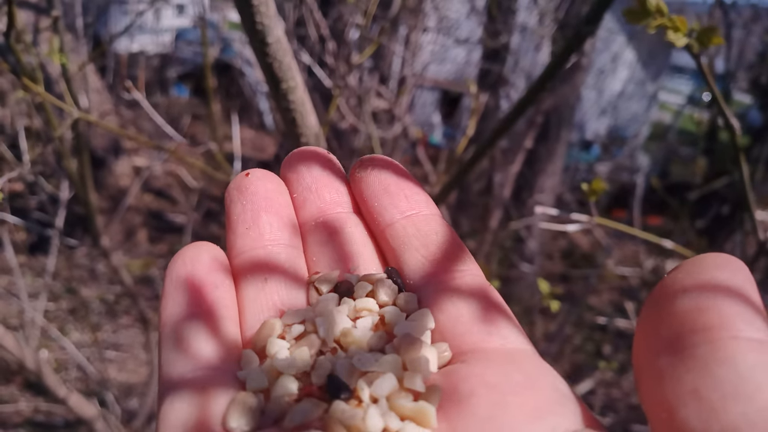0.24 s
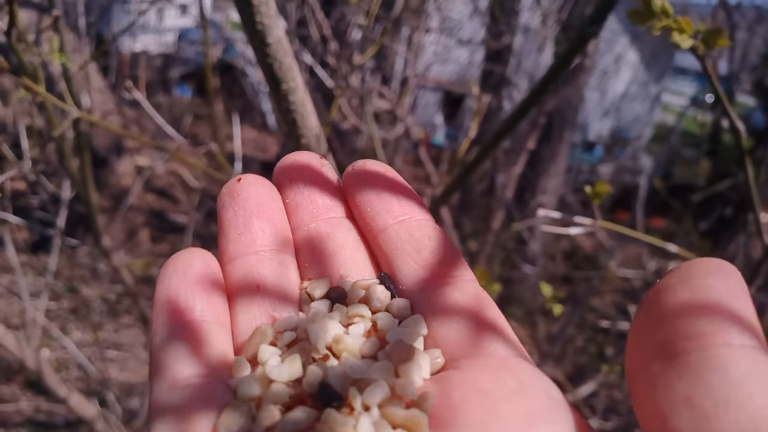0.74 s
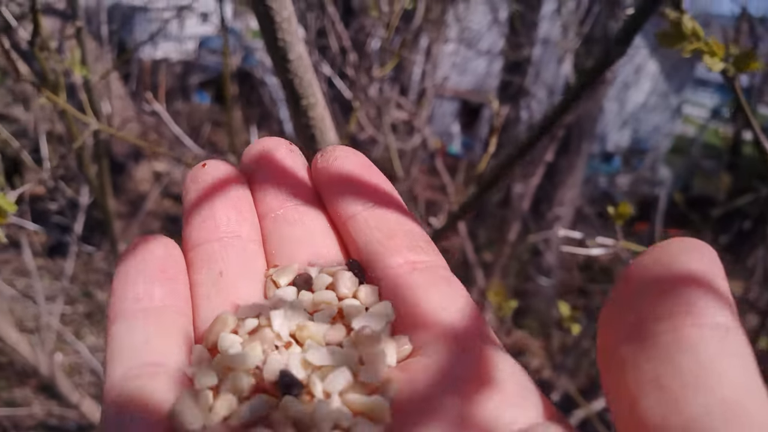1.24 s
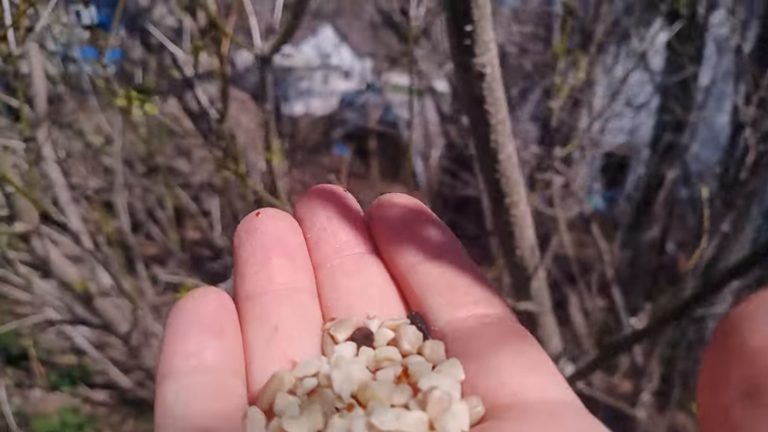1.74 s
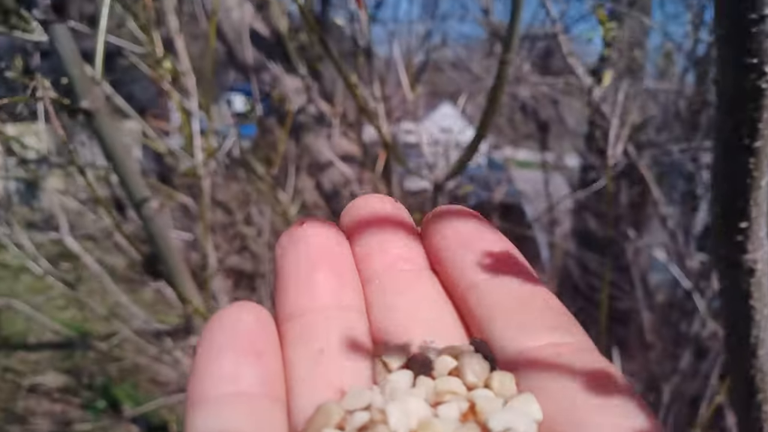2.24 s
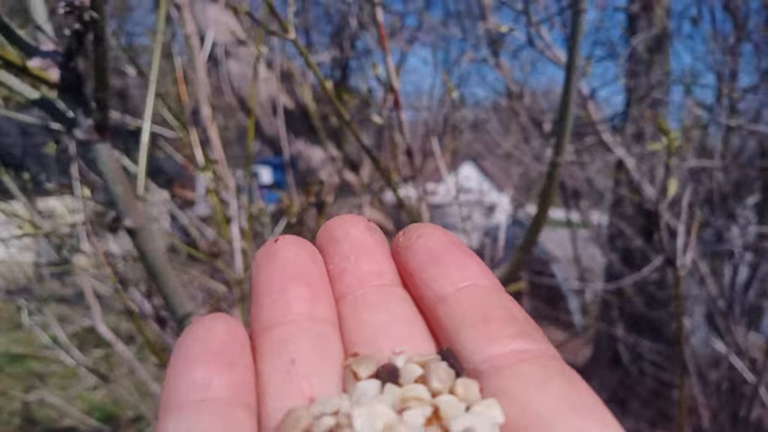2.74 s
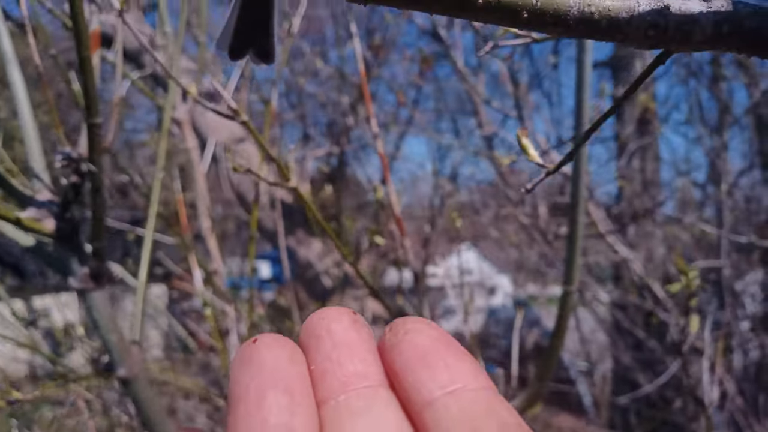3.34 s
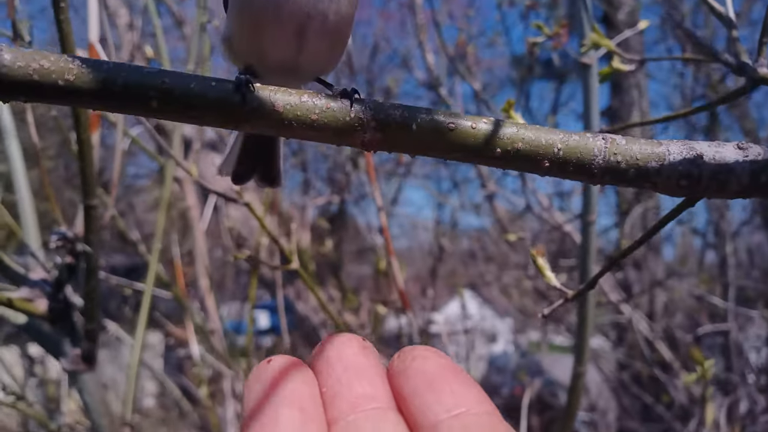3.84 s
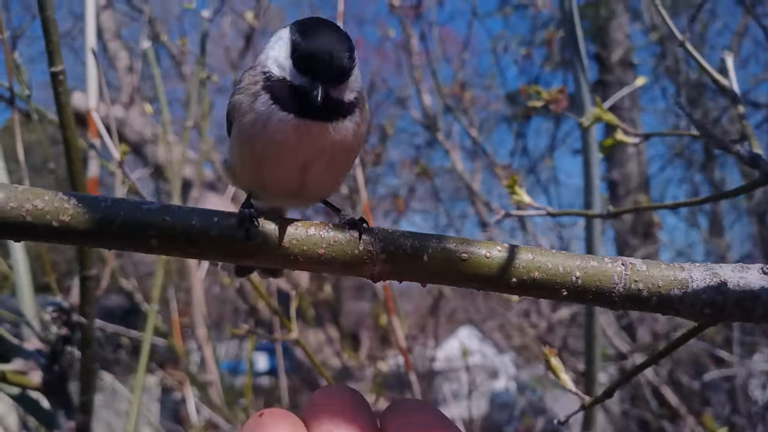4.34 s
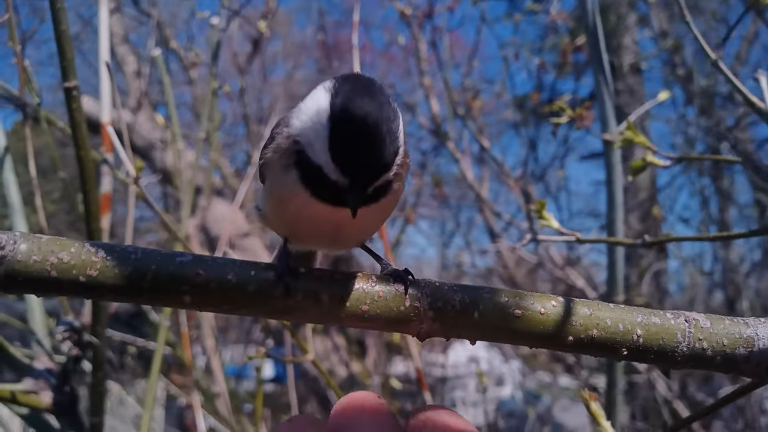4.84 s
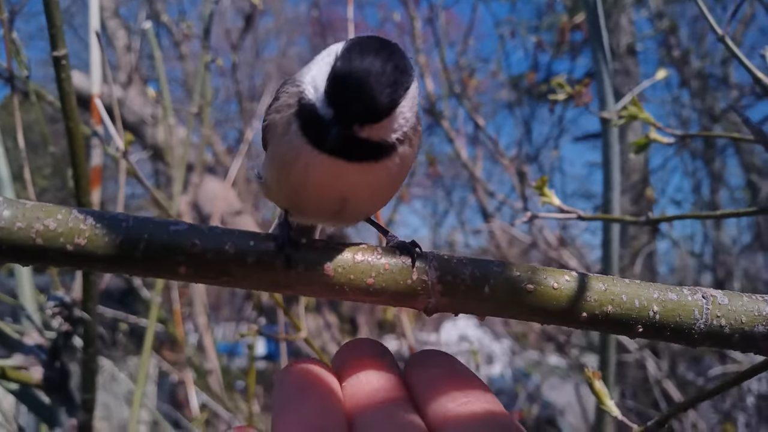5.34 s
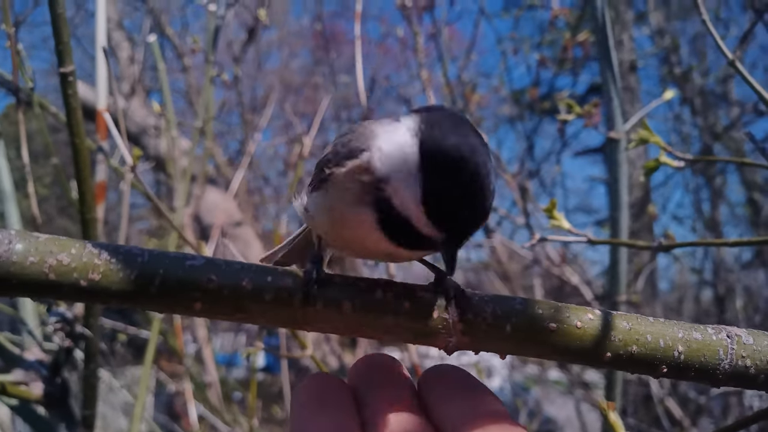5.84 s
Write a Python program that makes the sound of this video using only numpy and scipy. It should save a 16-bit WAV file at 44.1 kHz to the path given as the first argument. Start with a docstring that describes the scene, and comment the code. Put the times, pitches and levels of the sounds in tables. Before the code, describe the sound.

A small bird close by rasps harsh, buzzy begging notes in short bursts outdoors, over a low thumping engine rumble and soft distant traffic.

```python
"""A small bird in bare branches, close to the microphone, rasps groups of begging notes.
A fast membrane in its throat is shaken by a slower flap; moving bands of the windpipe colour the voice.
A far engine thumps about ten times a second as pushes into ringing exhaust modes; distant traffic
is a low filtered hiss, a far bird whistles a wavering sine, and a few twigs tick over a faint hiss."""
import sys
import numpy as np
from scipy import signal
from scipy.fft import rfft, irfft
from scipy.io import wavfile
from scipy.ndimage import uniform_filter1d

SR = 44100
rng = np.random.default_rng(int(sys.argv[2]) if len(sys.argv) > 2 else 0)


def inscribe(sig):
    """Save sig as 16-bit PCM at rate SR to the path in sys.argv[1].

    A 1-D sig is mono; a 2-D sig holds one channel per row.
    Samples are clipped to [-1, 1] before scaling.
    """
    pcm = np.round(np.clip(np.atleast_2d(sig).T, -1, 1) * 32767)
    wavfile.write(sys.argv[1], SR, pcm.astype(np.int16))


N = 268128
TIME = np.arange(N) / SR

# begging notes of the near bird: (start [s], end [s])
NOTE_SPANS = [(.63, .755), (.802, .882), (.955, 1.034), (2.47, 2.576), (2.626, 2.707), (2.754, 2.843),
              (2.918, 3.05), (4.24, 4.274), (4.369, 4.431), (5.865, 5.953), (6.018, 6.095)]
# sputters where the voice catches or dies: (middle [s], level [dB], Gaussian half width [ms], membrane [Hz])
SPUTTERS = [(0.949, -43, 1.7, 1750), (2.461, -34, 1.6, 2700), (2.464, -26, 0.66, 2738),
            (2.8452, -49, 1.11, 2050), (4.2283, -26, 0.96, 2542), (4.2363, -28, 1.04, 2076),
            (4.284, -26, 1.17, 1897), (4.303, -28.5, 0.83, 2256), (4.36, -29, 1.02, 1840),
            (4.363, -24.5, 0.7, 1897), (5.8588, -25.5, 0.93, 2150), (5.8638, -20, 0.42, 2336),
            (5.958, -17.5, 0.33, 2380), (5.963, -31, 0.45, 1953), (6.015, -21, 1.2, 1806)]
# the flap stops and the note clears: (start [s], end [s], membrane [Hz])
FLAP_STALLS = [(0.661, .718, 2471), (6.043, 6.058, 2207), (6.062, 6.072, 2330)]


def amp(db):
    """Decibels to gain."""
    return 10 ** (np.asarray(db) / 20)


def in_time(rows):
    """Columns of a table, after its time column, as curves over all samples."""
    times, *columns = np.transpose(rows)
    return [np.interp(TIME, times, column) for column in columns]


def gate(start, end, edge_s):
    """One between start and end, with short ramps."""
    return np.clip(np.minimum(TIME - start, end - TIME) / edge_s + .5, 0, 1)


def drift(rate_hz):
    """Random wander of spread 1: noise through a double one-pole low-pass."""
    pole = np.exp(-2 * np.pi * rate_hz / SR)
    settled = signal.lfilter([1], [1, -2 * pole, pole * pole], rng.standard_normal(N + SR))[SR:]
    return settled / settled.std()


def coloured(x, points):
    """Filters x along a spectrum in dB per Hz, which holds outright for unit white noise."""
    hz = np.maximum(np.fft.rfftfreq(N, 1 / SR), 1)
    point_hz, point_db = np.transpose(points)
    db = np.interp(np.log(hz), np.log(point_hz), point_db, left=-200, right=-200)
    return irfft(rfft(x) * amp(db) * np.sqrt(SR / 2), N)


def evened(x):
    """Divides out the slow level but keeps the fast beating."""
    return x / np.sqrt(uniform_filter1d(x ** 2, size=500) + 1e-9)


def ring(clicks, hz, t60):
    """Two-pole resonator: a unit click starts a decaying sine of initial height 1."""
    radius, angle = amp(-60 / (t60 * SR)), 2 * np.pi * hz / SR
    return signal.lfilter([0, np.sin(angle)], [1, -2 * radius * np.cos(angle), radius ** 2], clicks + 1e-18)


def bird():
    """The near voice passes three windpipe bands that move with posture, shaped by notes and sputters."""
    # faint top of the voice, as the microphone colours it: (frequency [Hz], level against the note [dB per Hz])
    faint_top = [(7600, -67.5), (8300, -66.5), (10300, -74), (10900, -90), (14000, -91.5), (15000, -78),
                 (15800, -74), (16300, -73)]
    # neck and beak: (from [s]; low [Hz], high [Hz], level against the note [dB] for each of
    # the chest, throat and beak bands; level of the faint top [dB])
    posture = [(0, 2250, 3900, -17, 4400, 6100, -2, 6500, 8100, -7, -6),
               (.78, 2420, 3900, -8, 4380, 5800, 2, 6700, 8300, -3, -18),
               (.92, 2380, 4070, -7.5, 4500, 6150, -3, 6600, 7600, -7.5, -16),
               (2.42, 2506, 3800, -21, 3570, 6500, -9.5, 5860, 7200, -1.1, 0.2),
               (2.6, 2450, 3646, -22.5, 3145, 4970, -4.5, 5720, 7176, -0.5, -3.5),
               (2.73, 1369, 4370, -20.5, 3130, 5140, -1.3, 5550, 7270, -0.2, -5.5),
               (2.89, 1424, 2700, -19.5, 2840, 4920, 1.4, 5820, 7075, -3, -4.5),
               (4.2, 2060, 3130, -19.5, 3068, 5200, -5, 5040, 7900, -4, 2),
               (4.34, 1605, 2870, -15.5, 3560, 6100, -1.4, 7500, 8300, -19.5, -1.5),
               (5.8, 1549, 3720, -12.5, 4433, 5770, -3.5, 5910, 7500, -0.2, 6),
               (5.99, 1517, 3300, -14.5, 4053, 5753, -7, 5670, 7450, 0.2, 4.5)]
    # the voice cuts out for a moment: (start [s], end [s])
    voice_break = (4.416, 4.421)
    voice_top_hz = 8140   # the recorder drops the voice steeply; 30 dB down from here
    lumps_db = 5.5   # a fully rough voice stumbles in level by this spread
    stall_chest_db = -7   # chest band while the flap stands
    chest_opens_s, chest_shut_db = .04, -2   # the chest band comes in late
    edge_s = 0.00095

    level_db, pitch_hz, rough, flap_hz, swing_rad, choke = controls()
    voice = syrinx(pitch_hz, rough, flap_hz, swing_rad, choke)
    level_db = level_db + lumps_db * rough * (1 - stalled()) * drift(80)
    sounding = sum(gate(a, b, edge_s) for a, b in NOTE_SPANS) - gate(*voice_break, edge_s)
    shape = amp(level_db) * sounding
    for s, db, half_ms, _ in SPUTTERS:
        shape += amp(db) * np.exp(-.5 * ((TIME - s) * 1000 / half_ms) ** 2)

    out = coloured(evened(voice), faint_top)
    top_cut = signal.cheby2(8, 30, voice_top_hz, fs=SR, output="sos")
    voice = signal.sosfilt(top_cut, voice)
    chest_db = stall_chest_db * stalled()
    for a, b in NOTE_SPANS:
        still_shut = np.clip(1 - (TIME - a) / chest_opens_s, 0, 1)
        chest_db = chest_db + chest_shut_db * gate(a, b, 0.0019) * still_shut
    starts = [round(row[0] * SR) for row in posture] + [N]
    for (_, *bands, faint_top_db), a, b in zip(posture, starts, starts[1:]):
        out[a:b] *= amp(faint_top_db)
        for (*band, db), more_db in zip(np.reshape(bands, (3, 3)), (chest_db[a:b], 0, 0)):
            sos = signal.butter(5, band, "band", fs=SR, output="sos")
            out[a:b] += amp(db + more_db) * evened(signal.sosfilt(sos, voice[a:b]))
    return shape * out


def syrinx(hz, rough, flap_hz, swing_rad, choke):
    """Membrane overtones, swung in phase and choked by the flap; roughness shakes both oscillators."""
    still = stalled()
    held = sum(gate(a, b, .002) for a, b in NOTE_SPANS)
    depth = (1 - still) * (.25 + .75 * held)   # a sputter alone is hardly flapped
    rough = np.clip(rough, 0, 1) * (1 - 0.841 * still)
    still_pitch = sum(still_hz * gate(a, b, .003) for a, b, still_hz in FLAP_STALLS)
    hz = uniform_filter1d(hz, size=300) * (1 - still) + still_pitch

    flap = 2 * np.pi * np.cumsum(flap_hz * (1 + .45 * rough * drift(130))) / SR
    swing = swing_rad * depth * np.sin(flap + 1.03) + 1.65 * rough * drift(500)
    shaken_hz = hz * (1 + .007 * drift(41.4) + .05 * rough * drift(90.15))
    phase = 2 * np.pi * np.cumsum(shaken_hz) / SR + swing
    puffs = np.exp(choke * depth * np.cos(flap)) * amp(4.0 * rough * drift(500))
    overtones = sum(np.cos(k * phase) for k in range(2, 7))
    return np.cos(phase) * puffs ** 0.31 + overtones * puffs   # the fundamental is choked least


def controls():
    """Every note follows the same arc: level, membrane pitch, roughness and flap as curves."""
    # arc of each note: (start to crest [s]; level after the attack, at the crest, before the release [dB];
    # membrane at the onset [Hz], rise [s], membrane held [Hz], at the end [Hz];
    # roughness early, late [0-1])
    notes = [(0.041, -31, -24, -28, 2520, 0.02223, 2750, 2560, .38, .16),
             (.043, -39, -36, -38, 2315, 0.034, 2350, 2500, .35, 0.15),
             (0.067, -35, -38.5, -37.5, 1750, 0.044, 1700, 1380, .6, .5),
             (.05, -19.5, -20, -18.5, 2550, .018, 2750, 2600, .45, 0.363),
             (0.064, -23.5, -20.5, -25.5, 2180, .045, 2480, 2250, .6, 0.2793),
             (0.064, -27, -25.5, -24, 1920, .056, 1980, 2150, 0.44, .24),
             (0.051, -29, -22.5, -23, 1800, .08, 1915, 1850, .6, 0.1426),
             (0.013, -26, -30, -22, 1740, .015, 1780, 1746, .5, .45),
             (0.014, -19, -24, -22.5, 2200, .028, 2600, 1700, .25, .17),
             (0.061, -17, -17, -18.5, 2350, .015, 2720, 2750, .27, 0.194),
             (0.028, -18, -16, -18, 1870, .057, 2608, 2650, .7, 0.2)]
    # flap in each note: (rate at start [Hz], rate at end [Hz], phase swing [rad], airflow choking [nepers])
    flap_action = [(478.7, 545, .52, 1.7), (611.2, 580, 1.2, 1.3), (308.7, 290, 1.06, 0.476),
                   (727, 810, .82, .4), (522.3, 540, .53, .83), (391.7, 420, .77, 0.64),
                   (293.2, 350, -0.6, .41), (380, 360, 0.42, 1.02), (421, 395, 0.59, 1.8),
                   (866, 690, 0.078, 1.4), (584, 730, .65, .95)]
    attack_s, attack_db, release_s, release_db = 0.014, -8, 0.014, -6.5
    sag_s = .02   # pitch leaves the held value this long before the end
    settle_share, end_rougher = .6, .2   # roughness reaches its late value, then frays

    level, rough, flap = [], [], []
    pitch = [(s, hz) for s, _, _, hz in SPUTTERS]
    for (a, b), note, (flap1, flap2, *act) in zip(NOTE_SPANS, notes, flap_action):
        crest, db1, db2, db3, hz1, rise, hz2, hz3, early, late = note
        level += [(a, db1 + attack_db), (a + attack_s, db1), (a + crest, db2)]
        level += [(b - release_s, db3), (b, db3 + release_db)]
        pitch += [(a, hz1), (a + rise, hz2), (max(b - sag_s, a + rise), hz2), (b, hz3)]
        rough += [(a, early), (a + settle_share * (b - a), late)]
        rough += [(b - sag_s, late), (b, late + end_rougher)]
        flap += [(a, flap1, *act), (b, flap2, *act)]
    return [curve for rows in (level, pitch, rough, flap) for curve in in_time(sorted(rows))]


def stalled():
    """One while the flap stands still."""
    return sum(gate(a, b, .003) for a, b, _ in FLAP_STALLS)


def thicket(x):
    """Trunks and branches scatter a short noisy tail, added to the direct sound."""
    echo_db, echo_t60_s = -23.5, 0.11
    t = TIME[:SR // 4]
    tail = rng.standard_normal(len(t)) * amp(-60 * t / echo_t60_s) * (t > .003)
    return x + amp(echo_db) * signal.fftconvolve(x, tail / np.linalg.norm(tail))[:N]


def engine():
    """Each far firing is a soft push into three exhaust modes, over a rumble."""
    # thumps of the engine: (time [s], level before the mode shares [dB])
    thumps = [(.014, -23.5), (.114, -27.5), (0.211, -25), (0.316, -31.5), (0.398, -23.5), (0.492, -23.5),
              (.588, -28.5), (.681, -25), (.783, -26.5), (.879, -29.5), (0.972, -25.5), (1.075, -26.5),
              (1.17, -24), (1.256, -26), (1.354, -25.5), (1.452, -28.5), (1.55, -33.5), (1.652, -21.5),
              (1.734, -25.5), (1.831, -28.5), (1.931, -26.5), (2.024, -31), (2.12, -26), (2.217, -26.5),
              (2.311, -29), (2.408, -27.5), (2.512, -25.5), (2.604, -27.5), (2.717, -27.5), (2.805, -25.5),
              (2.893, -23), (2.988, -20.5), (3.087, -25.5), (3.18, -26.5), (3.275, -28.5), (3.366, -24),
              (3.466, -24.5), (3.562, -28), (3.659, -30), (3.755, -24.5), (3.844, -26), (3.962, -25),
              (4.043, -24.5), (4.131, -25), (4.237, -26), (4.337, -22.5), (4.43, -28), (4.523, -25.5),
              (4.62, -26), (4.722, -26), (4.813, -25.5), (4.906, -25), (5.008, -27), (5.103, -23.5),
              (5.202, -22.5), (5.302, -26.5), (5.39, -24), (5.492, -30), (5.592, -28), (5.688, -29),
              (5.783, -25.5), (5.876, -26.5), (5.972, -26)]
    # ringing exhaust modes: (frequency [Hz], decay by 60 dB [s], level against the thump [dB])
    exhaust = [(75.4, 0.37, -8), (105.9, 0.14, 4.5), (138.3, 0.14, 3)]
    # further share of the lowest mode, before its random spread: (time [s], level [dB])
    low_mode = [(0, -19), (.45, -3), (.65, -10), (1.5, -17), (1.72, -11), (1.95, -11), (2.89, -15.5),
                (2.987, 8), (3.15, -6), (3.95, -14), (4.13, 1.5), (4.45, -5), (4.7, -8.5), (6.08, -8)]
    # rumble spectrum before its slow wander: (frequency [Hz], level [dB per Hz])
    rumble = [(20, -89), (45, -68.5), (80, -59.5), (110, -57), (150, -67.5), (250, -83), (330, -90),
              (450, -100)]
    low_spread_db, high_mode_db, high_spread_db = 3, -14, 4

    s, thump_db = np.transpose(thumps)
    low, high = rng.standard_normal((len(s), 2)).T
    low_db = np.interp(s, *np.transpose(low_mode)) + low_spread_db * low
    high_db = high_mode_db + high_spread_db * high
    push = np.hanning(int(0.013 * SR))
    out = coloured(rng.standard_normal(N), rumble) * amp(2.1 * drift(2.8))
    for (hz, t60, db), share_db in zip(exhaust, (low_db, 0, high_db)):
        clicks = np.zeros(N)
        clicks[(s * SR).astype(int)] = amp(thump_db + share_db + db)
        swell = push * np.cos(2 * np.pi * hz * TIME[:len(push)])   # drives the mode up over its length
        out += ring(signal.fftconvolve(clicks, 2 * swell / push.sum())[:N], hz, t60)
    return out


def traffic():
    """Distant traffic: a soft low hiss that swells and fades unevenly."""
    # balance of the hiss, made to unit level later: (frequency [Hz], relative level [dB per Hz])
    hiss_spectrum = [(200, -6.5), (400, -4), (600, 4), (900, 3.5), (1300, 3), (2000, -6), (3200, -16.5)]
    # swells before the final gain: (time [s], level of the low part [dB], level of the high part [dB])
    swells = [(0, -63.5, -60.5), (.6, -59, -62), (1.5, -64.5, -65), (2.3, -63.5, -63.5), (2.9, -58, -57),
              (3.3, -60.5, -59.5), (3.7, -57.5, -57.5), (4.2, -60.5, -56.5), (4.8, -60, -56),
              (5.4, -55.5, -54.5), (5.8, -61, -57.5), (6.08, -55.5, -50.5)]
    gain_db, split_hz = 8.0, 850

    hiss = coloured(rng.standard_normal(N), hiss_spectrum)
    low_db, high_db = in_time(swells)
    edges, out = np.geomspace(200, 3300, num=19), 0
    for low, high in zip(edges, edges[1:]):
        sos = signal.butter(2, [low, high], "band", fs=SR, output="sos")
        swell_db = low_db if high < split_hz else high_db
        wander_db = 1.9 * drift(3) + 1.8 * drift(20)
        out = out + signal.sosfilt(sos, hiss) * amp(swell_db + wander_db)
    return amp(gain_db) * out / hiss.std()


def whistles():
    """A far bird holds a thin wavering sine that swells and fades."""
    # phrases, before the wavering: (start [s], crest [s], end [s], pitch [Hz], rms level at the crest [dB])
    phrases = [(0, .02, .09, 3100, -65), (2.124, 2.188, 2.216, 3160, -57), (2.216, 2.24, 2.40, 3165, -62),
               (3.6, 3.62, 3.656, 3140, -61), (3.656, 3.68, 3.86, 3130, -64.5)]
    fade_db = -17.5   # at both ends, against the crest

    rows = []
    for a, crest, b, hz, db in phrases:
        rows += [(a, hz, db + fade_db), (crest, hz, db), (b, hz, db + fade_db)]
    hz, db = in_time(rows)
    on = sum(gate(a, b, .01) for a, _, b, *_ in phrases)
    phase = 2 * np.pi * np.cumsum(hz * (1 + 0.0037 * drift(16.02))) / SR
    return on * np.sqrt(2) * amp(db + 2.0 * drift(30)) * np.sin(phase)


def twigs():
    """Each tick is a click with a brief ring, and a broad crack on top."""
    # ticks: (time [s], ring level [dB], pitch [Hz], decay by 60 dB [s], crack against the ring [dB])
    ticks = [(1.704, -52, 5915, 0.033, -12), (1.749, -54, 7160, 0.0095, -10),
             (2.3198, -40.5, 6200, 0.0059, 2), (2.3632, -47, 6060, 0.0069, -9),
             (2.3842, -39.5, 5690, 0.0072, -14), (5.681, -55, 5840, 0.028, -9)]
    out = np.zeros(N)
    for s, db, hz, t60, crack_db in ticks:
        click = amp(db) * (np.arange(N) == round(s * SR))
        out += ring(click, hz, t60) + amp(crack_db) * np.diff(click, prepend=0)
    return out


def background_hiss():
    """Steady faint background hiss, coloured by the microphone: filtered white noise."""
    # spectrum of the hiss: (frequency [Hz], level [dB per Hz])
    floor_spectrum = [(300, -88.5), (1500, -99.5), (3500, -104), (7200, -107), (7800, -117), (9500, -120),
                      (14000, -121), (15000, -112), (15800, -110), (16300, -116)]
    return coloured(rng.standard_normal(N), floor_spectrum)


def scene():
    """All sources at one microphone; only the birds and twigs get the tail of the branches."""
    among_branches = thicket(bird() + twigs() + whistles())
    return (among_branches + engine() + traffic() + background_hiss())[None]


def record(dry):
    """The microphone drops the deepest bass; the top is cut."""
    thin = signal.sosfilt(signal.butter(2, 48, "high", fs=SR, output="sos"), dry)
    top_cut = signal.cheby2(26, 60, 16100, fs=SR, output="sos")   # 60 dB down from 16100 Hz
    return signal.sosfilt(top_cut, thin)


dry = scene()
out = record(dry)
inscribe(out)
```